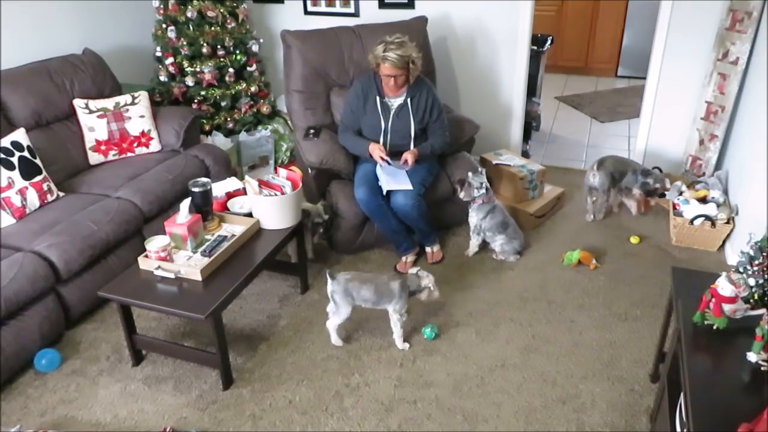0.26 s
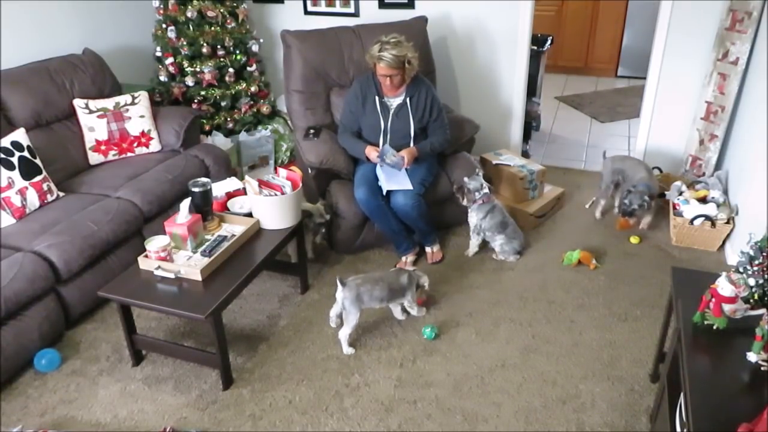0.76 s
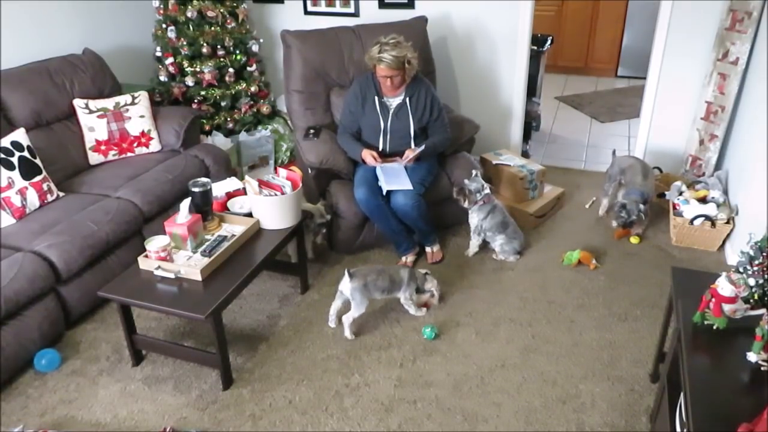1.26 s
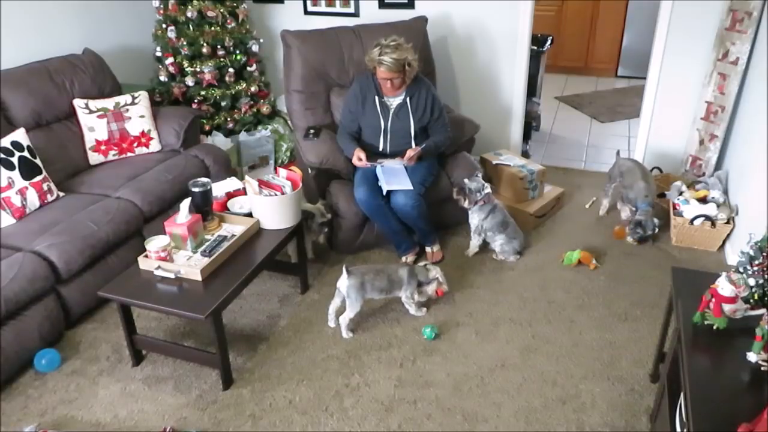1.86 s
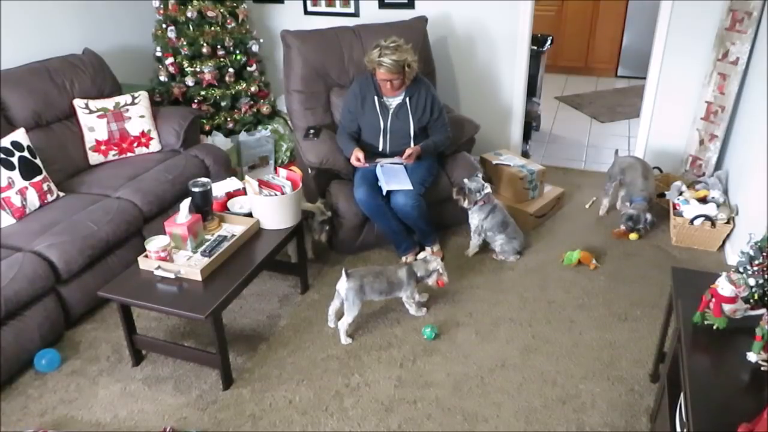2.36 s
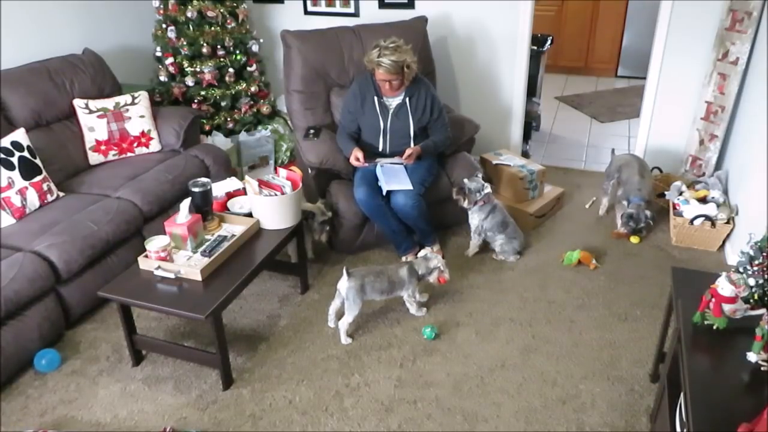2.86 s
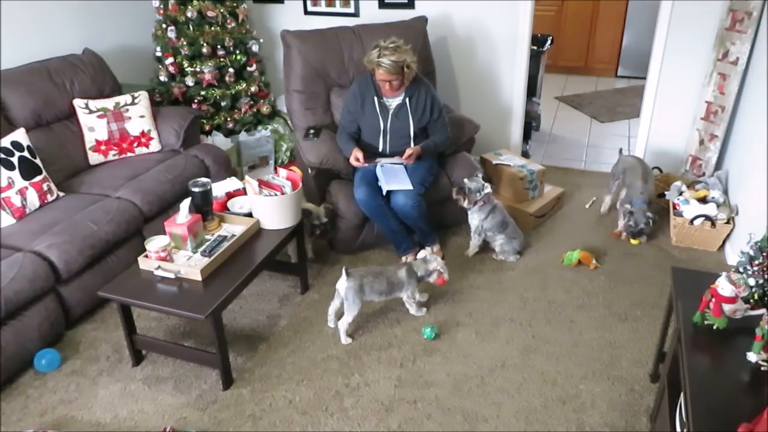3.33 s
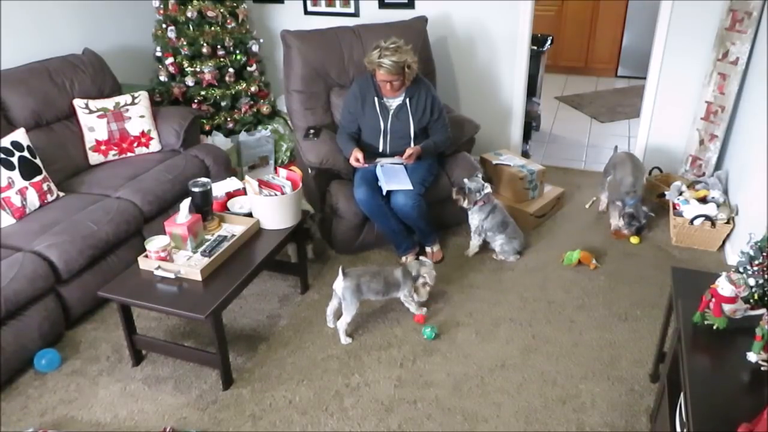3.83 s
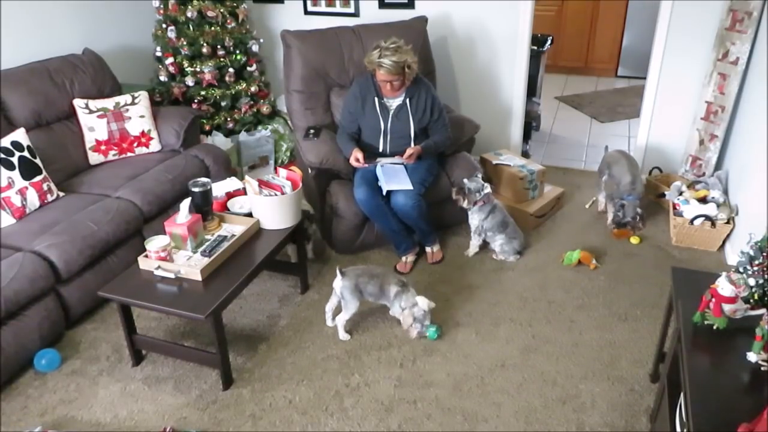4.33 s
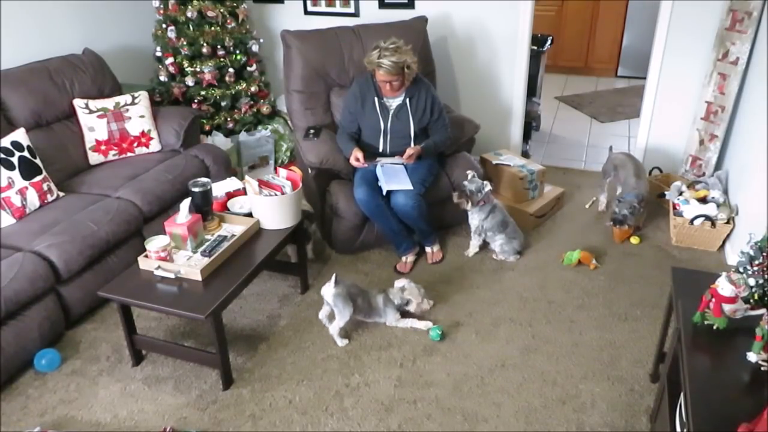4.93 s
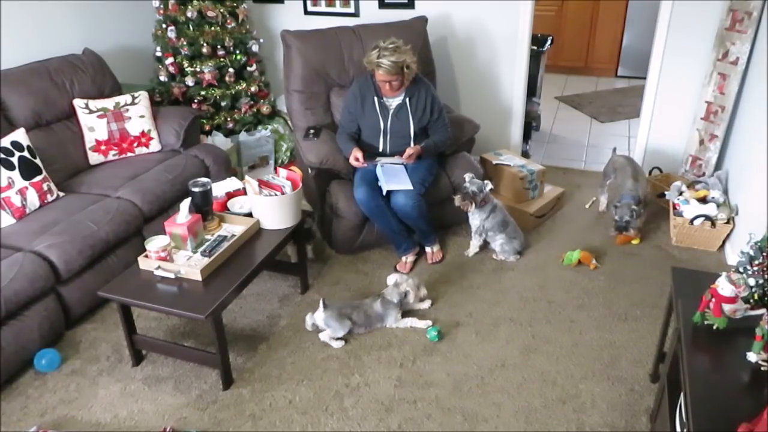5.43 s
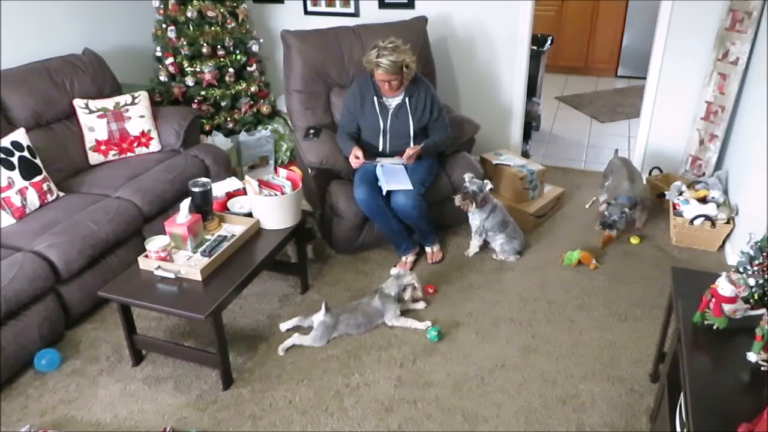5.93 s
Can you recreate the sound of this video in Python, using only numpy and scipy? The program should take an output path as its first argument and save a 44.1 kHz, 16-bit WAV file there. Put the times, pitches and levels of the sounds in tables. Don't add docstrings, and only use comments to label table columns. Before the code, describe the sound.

Short, hoarse rubber-toy squeaks come in uneven bursts as a dog bites and releases, with paw thuds, small knocks and faint room tone.

```python
import sys
import numpy as np
from scipy import signal
from scipy.fft import rfft, irfft, next_fast_len
from scipy.io import wavfile
from scipy.ndimage import uniform_filter1d

SR = 44100
rng = np.random.default_rng(int(sys.argv[2]) if len(sys.argv) > 2 else 0)


def master_out(mix):
    frames = np.transpose(np.atleast_2d(mix))
    ceiling = np.clip(frames, -1, 1)
    pcm = np.round(ceiling * 32767).astype(np.int16)
    wavfile.write(sys.argv[1], SR, pcm)


def rack_gain(trim_db):
    fader = np.asarray(trim_db, float)
    return 10 ** (fader / 20)


N = 272979

# frequency in Hz, density in dB per Hz.
TONE_SPECTRUM = [(15, -33), (25, 5), (82, -6.5), (113, -9), (144, -9), (413, -11.5), (448, -12), (708, -16),
                 (768, -16.5), (878, -17), (2730, -21), (3380, -22.5), (11000, -36.5), (15700, -48)]
# frequency in Hz, side over mid in dB.
TONE_SIDE = [(60, -24), (150, -3.5), (380, 1.5), (950, 0.5), (2380, -2), (5980, -1.5), (15000, -3)]
# frequency in Hz, side over mid in dB.
ROOM_SIDE = [(100, -30), (400, -30), (1000, -19), (2000, -19.5), (4000, -6), (8000, -1.5), (13000, 4)]
# frequency in Hz, phase lead of left in radians.
PORT_PHASE = [(300, 0), (3000, .05), (6300, .3), (8500, -1.2), (10100, .1), (13400, -2.6), (15400, -1)]
# frequency in Hz, T60 in seconds.
ROOM_T60 = [(100, 0.36), (800, 0.3), (2000, 0.31), (5500, 0.3), (10000, 0.2), (14000, 0.19)]
# delay in seconds, level in dB re tail.
ECHOES = [
    (.0021, -9),
    (.0062, -10),
    (0.0139, -10.5),
    (.021, -18.5),
]
# frequency in Hz, level in dB.
SOFT_WALLS = [(200, 1.5), (1000, 0), (4000, 0), (9000, -3), (12000, -2), (15500, -7.5)]
# start in seconds, peak in dB, pitch in Hz, T60 in seconds.
THUDS = [(0.28, -31.5, 71.7, 0.066), (0.462, -46.5, 104, 0.35), (0.569, -45, 51.1, 0.15),
         (0.823, -31.5, 76.5, 0.13), (0.894, -37.5, 77.5, 0.13), (1.031, -50, 50.6, 0.2),
         (1.424, -31, 86.6, 0.14), (1.723, -42, 93, 0.12), (2.043, -39.5, 108, 0.15),
         (2.438, -43, 70, 0.28), (2.469, -62, 49, 0.15), (3.696, -29.5, 74, 0.13),
         (3.844, -44.5, 52.4, 0.34), (4.052, -47, 74, 0.27), (4.142, -35, 67.6, 0.28),
         (4.17, -35, 54, 0.23), (4.202, -24, 79.5, 0.08), (5.681, -50, 68.6, 0.18),
         (5.751, -39.5, 62, 0.17), (6.111, -43, 65.3, 0.11), (6.148, -35, 50.3, 0.17)]
# start in seconds, peak in dB, pitch in Hz, T60 in seconds.
KNOCKS = [(1.197, -55, 434, 0.076), (1.422, -32, 199, 0.093), (1.42, -27.5, 402, 0.055),
          (1.436, -35, 284, 0.11), (1.448, -54, 430, 0.086), (1.47, -40, 210, 0.094),
          (1.895, -42, 350, 0.043), (2.049, -40.5, 178, 0.13), (3.633, -39.5, 385, 0.045),
          (3.656, -38.5, 185, 0.1), (4.172, -41, 190, 0.21), (4.431, -51, 170, 0.14),
          (4.459, -47.5, 177, 0.43), (4.899, -43.5, 340, 0.13), (5.161, -48, 431, 0.088)]
# time in seconds, level in dB.
FUR_SLIDE = [
    (5.85, -85),
    (5.924, -88),
    (5.954, -73),
    (6.114, -62.5),
    (6.18, -72),
    (6.19, -77),
]
# start in seconds, ring peak in dB, ring pitch in Hz, crack above 6 kHz in dB.
CLICKS = [(0.906, -35, 2480, -49), (1.185, -46.5, 1770, -73), (1.4225, -32, 2100, -58),
          (2.417, -24.5, 3034, -18), (2.4287, -45, 2660, -46), (3.617, -36.5, 3120, -63.5),
          (4.2362, -43, 3360, -60), (4.4295, -39, 820, -70), (4.79, -48, 2000, -62),
          (5.1655, -34.5, 2050, -42), (5.9584, -45, 1540, -67), (6.05, -46, 1280, -69),
          (6.1004, -55, 1700, -65)]
# time in seconds, pitch in Hz, level in dB.
INTAKE = [
    (4.65, 7500, -67),
    (4.664, 7520, -39.5),
    (4.704, 7570, -91),
    (4.726, 7400, -43),
    (4.77, 7900, -84),
]

# start, crest and end in seconds, crest and end level in dB.
BITES = [(0, 0.03, .15, -40, -56.5), (0.287, 0.407, .455, -36.5, -40), (0.471, 0.539, .6, -33.5, -39),
         (0.637, 0.672, .74, -38, -43), (0.731, 0.751, .825, -36.5, -50), (1.419, 1.421, 1.465, -41.5, -57),
         (1.509, 1.528, 1.595, -48, -53.5), (1.612, 1.658, 1.685, -39.5, -54),
         (1.879, 1.892, 1.935, -43.5, -54.5), (1.949, 1.984, 2.005, -46.5, -42.5),
         (2.021, 2.095, 2.14, -29, -40), (2.155, 2.182, 2.27, -43.5, -46.5), (3.255, 3.278, 3.32, -31, -45),
         (3.45, 3.458, 3.49, -48, -64), (3.627, 3.641, 3.725, -44, -45),
         (4.493, 4.547, 4.576, -44.5, -60.5), (4.837, 4.863, 4.895, -42, -53.5),
         (4.907, 4.952, 5.03, -34.5, -50), (5.082, 5.161, 5.237, -47, -57), (5.259, 5.27, 5.35, -35, -43),
         (5.567, 5.594, 5.62, -47.5, -77), (5.623, 5.635, 5.72, -38.5, -49)]
# start, crest and end in Hz, lateness exponents of the swell and of the fall.
PITCH = [(1147, 1110, 945, 1.23, .7), (969, 1345, 1000, 2.7, 1.6), (1118, 1255, 1065, 2.7, 1.2),
         (1143, 1590, 1170, .8, 0.92), (1173, 1100, 936, 1.8, 0.94), (1406, 1500, 1010, 0.95, 0.55),
         (950, 1000, 930, 0.71, 0.85), (1092, 1130, 990, 0.84, 1.14), (980, 940, 915, 1.1, 1),
         (955, 1015, 957, 1.21, 1), (1120, 1258, 1030, 1.8, 1), (980, 958, 930, 0.81, 1.62),
         (1080, 1147, 1050, 0.9, 1.12), (924, 947, 880, 1.1, 2.1), (1036, 1320, 905, 0.91, .78),
         (1074, 1115, 950, 1.46, 1.06), (1224, 1262, 1030, 1.1, 0.905), (1033, 1182, 960, 0.8, 1.3),
         (928, 1112, 935, .7, 1.6), (1110, 1118, 1012, 0.86, 0.42), (1434, 1635, 1600, 0.9, 2.7),
         (1235, 1265, 1095, 1.1, 0.55)]
# one bite, in dB.
SOFT_START_DB = [-4.5, 7.5, 5.5, 4, 1, 10, -2, 3, 2, -6, 4.5, 5, 6, 2, 4, 9, 4, 1.5, 2, 7, -2, 2]
# lateness exponent of the level fall, shading above 11 kHz in dB.
RELEASE = [(1.398, -2), (0.67, -4.5), (0.77, 1), (1.2, -1.5), (1.12, -8), (1.33, -12), (1.5, -5),
           (1.098, 1), (1.4, -1), (1.1, 5.5), (1.25, 8), (1.6, -0.5), (0.83, 2.5), (0.89, -2), (1, 4),
           (1.07, 0), (0.78, 7), (0.92, 11), (1.64, 2), (0.61, -1), (0.5, 10), (0.93, 7)]
HOARSE = [(.006, 0, 0, .04), (.005, .03, .04, .035), (.004, .03, 0, .025), (.003, 0, 0, .035),
          (.005, 0, 0, .05), (.013, 0, 0, .11), (.002, 0, .02, .015), (.003, .04, 0, .025),
          (.003, .03, 0, .02), (.002, .03, 0, .015), (.002, 0, .02, .01), (.001, .02, 0, .008),
          (.003, .05, .01, .02), (.002, .04, 0, .02), (.004, 0, 0, .045), (.002, .03, .02, .012),
          (.004, .07, .03, .035), (.006, 0, 0, .05), (.002, .05, .02, .012), (.002, 0, .02, .02),
          (.006, .08, .03, .05), (.004, .17, 0, .035)]
# first, second and third partial in dB over the higher ones.
GRIP = [(-2.5, -1, -0.5), (-1, 4, -3), (-2, -2.5, 0), (9.5, 4, -0.5), (-11.5, -4.5, -5.5), (2.5, -3, -6.5),
        (5, -0.5, -3.5), (1.5, 0, -9), (-4, -10, -5), (-5.5, -10.5, -4), (-15.5, -6.5, -7.5),
        (-3.5, -5, 0.5), (-7.5, -4.5, -7), (-0.5, 7, 4), (-2.5, 3.5, -2.5), (2.5, 8.5, 6), (6.5, -8, 6),
        (-14.5, -10.5, -9.5), (4.5, 5.5, -2), (-11.5, -6.5, -9.5), (11, 2, 7.5), (-2.5, -9, -3)]
# change of first and second partial by the end of the fall, in dB.
OPENING = [(0, 9), (-0.5, -8), (-4.5, 2.5), (-15, -3), (23.5, 7.5), (4.5, 8), (0.5, 8.5), (-1, -20),
           (-3.5, 17), (-2, 14), (4, -4.5), (-2, 5.5), (4, 6.5), (-2, -6), (6, -3.5), (8.5, -13), (-6, 13),
           (17, 9.5), (6.5, 1), (11.5, -3), (13, 14), (4, 8.5)]
# frequency in Hz, level in dB.
HOLLOW = [(3500, 6), (4600, 2.5), (5800, 2), (6800, -10.5), (8500, -7), (10500, -13), (12700, -19),
          (15500, -32)]
# at 5.3 kHz, at 6.3 kHz and above 8 kHz in dB, direct sound in dB as the head turns.
SHADE = [(4, -9, 5, -1), (-7.5, -26, 5, -4.5), (-8, -6, -5.5, -1), (-23, -32, -6.5, 0),
         (1, -15, 17.5, -4.5), (-2, -3, -2, 3), (-3, -16, 16.5, -2), (3.5, 3, 12, -3), (-8, -18, 0, -2.5),
         (-8, -13, -3, 0), (14, 16.5, 6, 2), (-2, -4, 2.5, 0), (-1.5, 11, 2, 0), (2, -5, 6.5, -1.5),
         (-5, -6.5, 3, 1), (-6.5, 2.5, -4.5, 4.5), (0, 2, 0.5, -3), (4, 15.5, -3.5, -1), (-7, 0, 2.5, -0.5),
         (-7, -3, -2, 0), (-19, 14, 4, -6), (1, -13, -2, 0)]
# one bite, in dB.
NOTCH_DB = [7.5, 6.5, -3, 0, 10, -3, 15, 2, 7, 4, 8, 10, -1, -13, -1.5, -21, 10, 9, 0, -6.5, 9, 3.5]
# one bite, in dB.
THROAT_DB = [0.3, -0.32, 3, -2, 0.83, 0.84, 0, 1.5, 0, 0.5, 2, 0.5, 5, -0.5, 0, 1.5, -4, 6.5, 1.5, 1.7, 1,
             1]


def rms_one(x):
    return x / np.sqrt(np.mean(x ** 2) + 1e-20)


def at_hz(points, hz):
    table_hz, values = np.array(points)[:, 0], np.array(points)[:, 1]
    return np.interp(np.log(np.maximum(hz, 1)), np.log(table_hz), values)


def bandpass(x, low_hz, high_hz):
    return signal.sosfilt(signal.butter(2, [low_hz, high_hz], "band", fs=SR, output="sos"), x)


def drift(rate_hz):
    pole = np.exp(-2 * np.pi * rate_hz / SR)
    noise = rng.standard_normal(N + SR)
    return rms_one(signal.lfilter([1], [1, -2 * pole, pole * pole], noise)[SR:])


def stroke(rows, rise_s, fall_s):
    s, *columns = np.transpose(rows)
    at = np.arange(max(round(s[0] * SR), 0), min(round(s[-1] * SR), N))
    rise = (at / SR - s[0] + (s[0] < rise_s)) / rise_s
    fall = (s[-1] - at / SR) / fall_s
    gate = np.sin(np.pi / 2 * np.clip(np.minimum(rise, fall), 0, 1)) ** 2
    return at, [np.interp(at / SR, s, c) for c in columns], gate


def blow(s, db, hz, t60_s, rise_s, rough):
    at = min(round(s * SR), N - 1)
    t = np.arange(min(N - at, SR // 2, round(0.86 * max(t60_s, .01) * SR))) / SR
    noise = bandpass(rng.standard_normal(SR // 2)[:len(t) + SR // 20], hz * .6, hz * 1.5)
    body = (1 - rough) * np.sin(2 * np.pi * hz * t) + rough * rms_one(noise)[:len(t)]
    envelope = rack_gain(db - 60 * t / max(t60_s, .003)) * (1 - np.exp(-t / rise_s))
    out = np.zeros(N)
    out[at:at + len(t)] = envelope * body
    return out


def still_air(level_db, sway_db):
    hz = np.arange(N // 2 + 1) * SR / N
    rumble_cut = np.sqrt(1 + (34 / (hz + 1)) ** 12)
    mid, side = rfft(rng.standard_normal((2, N))) * rack_gain(at_hz(TONE_SPECTRUM, hz)) / rumble_cut
    side = side * rack_gain(at_hz(TONE_SIDE, hz))
    both = np.array([mid + side, mid - side])
    low = 1 / (1 + (hz / 120) ** 4)
    tone = irfft(both * low, N) * rack_gain(sway_db * drift(2.1)) + irfft(both * (1 - low), N)
    return rack_gain(level_db) * tone / np.sqrt(np.mean(irfft(mid, N) ** 2))


def room(facing, all_round, wet_db, gap_s):
    size = next_fast_len(N + SR)
    hz = np.arange(size // 2 + 1) * SR / size
    t = np.arange(SR // 2) / SR
    tail, white = 0, rng.standard_normal((2, SR // 2))
    build_up = 1 - np.exp(-(t / gap_s) ** 2)
    for low_hz in 44 * 2. ** np.arange(0, 8.5, .5):
        band = bandpass(white, low_hz, low_hz * np.sqrt(2))
        tail = tail + band * rack_gain(-60 * t / at_hz(ROOM_T60, low_hz * 1.1)) * build_up
    mid, side = rfft(tail / np.sqrt(np.sum(tail[0] ** 2)), size) * rack_gain(at_hz(SOFT_WALLS, hz))
    mid = mid + sum(rack_gain(db) * np.exp(-2j * np.pi * hz * s) for s, db in ECHOES)
    side = side * rack_gain(at_hz(ROOM_SIDE, hz))
    ports = np.exp(.5j * at_hz(PORT_PHASE, hz) * np.array([[1], [-1]]))
    direct = rfft(facing, size) * ports
    reverb = rfft(all_round, size) * rack_gain(wet_db) * np.array([mid + side, mid - side])
    return irfft(direct + reverb, size)[:, :N]


def paw_thuds():
    return sum(blow(s, db, hz, t60_s, rise_s=.008, rough=.2) for s, db, hz, t60_s in THUDS)


def jaw_knocks():
    return sum(blow(s, db + 1.5, hz, t60_s, rise_s=0.00052, rough=0.28) for s, db, hz, t60_s in KNOCKS)


def fur():
    out = np.zeros(N)
    at, (db,), gate = stroke(FUR_SLIDE, rise_s=.02, fall_s=.002)
    noise = rms_one(bandpass(rng.standard_normal(N), 700, 3000))
    out[at] = gate * rack_gain(db + 2.2 * drift(24)[at]) * noise[at]
    return out


def teeth():
    crack = sum(blow(s, crack_db - 0.5, 11200, 0.0065, 0.00066, rough=0.53) for s, _, _, crack_db in CLICKS)
    ring = sum(blow(s, db - 3.0, hz, 0.044, 0.00059, rough=0.51) for s, db, hz, _ in CLICKS)
    return crack + ring


def intake():
    out = np.zeros(N)
    at, (hz, db), gate = stroke(INTAKE, rise_s=.008, fall_s=.02)
    phase = 2 * np.pi * np.cumsum(hz * (1 + 0.0033 * drift(87)[at])) / SR
    out[at] = gate * rack_gain(db - 10.0 + 2.9 * drift(36)[at]) * np.sin(phase)
    return out


def bite(times, pitch, soft_db, late_drop):
    start_s, crest_s, end_s, crest_db, end_db = times
    start_hz, crest_hz, end_hz, late_swell, late_fall = pitch
    at, (swell, fall), gate = stroke([(start_s, 0, 0), (crest_s, 1, 0), (end_s, 1, 1)], .004, .008)
    up = np.sin(np.pi / 2 * swell ** late_swell) ** 2
    down = np.sin(np.pi / 2 * fall ** late_fall) ** 2
    rising_hz = start_hz + (crest_hz - start_hz) * up
    hz = rising_hz + (end_hz - crest_hz) * down
    db_per_octave = 9.5
    db = crest_db + db_per_octave * np.log2(rising_hz / crest_hz) - soft_db * (1 - swell)
    return at, gate, fall, hz, db + (end_db - crest_db) * fall ** late_drop


def bend(hz, at, sag, scoop):
    sag_s, scoop_s = .028, .012
    ending = np.clip(1 - (at[-1] - at) / (sag_s * SR), 0, 1)
    onset = np.clip(1 - (at - at[0]) / (scoop_s * SR), 0, 1) ** 2
    return hz * (1 - sag * ending - scoop * onset)


def squeaker(flutter_db, hiss_db):
    out = np.zeros((2, N))
    wander = drift(190) + drift(47.0)
    k = np.arange(1, 17)[:, None]
    upper = k[3:]
    flutter = np.array([drift(69) for _ in range(4)])[k[:, 0] % 4]
    white = rng.standard_normal(N)
    hiss = rms_one(bandpass(white, 1510, 7900))
    shiver = rms_one(bandpass(white, 50.3, 390))
    lean = rng.standard_normal((len(BITES), 16))
    for i, own in enumerate(lean):
        late_drop, edge_db = RELEASE[i]
        hoarse, sag, scoop, rasp = HOARSE[i]
        mid_db, dip_db, top_db, facing_db = SHADE[i]
        at, gate, fall, hz, db = bite(BITES[i], PITCH[i], SOFT_START_DB[i], late_drop)

        hz = bend(hz, at, sag, scoop)
        slide = uniform_filter1d(np.gradient(np.log(hz)) * SR, size=400)
        waver = hoarse * np.clip(.4 + np.maximum(-slide / 2.5, slide / 6), 0, 2)
        phase = 2 * np.pi * np.cumsum(hz * (1 + waver * wander[at])) / SR
        phase = phase + rasp * (.5 + .7 * waver / hoarse) * shiver[at]

        shade = [(4300, THROAT_DB[i]), (5300, mid_db), (6300, dip_db), (7200, NOTCH_DB[i]),
                 (9200, top_db), (11500, top_db + edge_db)]
        upper_hz = upper * hz
        high = rack_gain(at_hz(HOLLOW, upper_hz) + at_hz(shade, upper_hz) + 2 * own[3:, None]) * (upper_hz < 16500)
        high = rack_gain(db) * high / np.sqrt(np.sum(high ** 2, axis=0))
        low = rack_gain(db + np.array(GRIP[i])[:, None] + np.append(OPENING[i], 0)[:, None] * fall)
        depth_db = flutter_db * np.minimum(np.sqrt(waver / 0.001), 1.6)
        levels = np.vstack([low, high]) * rack_gain(depth_db * flutter[:, at])

        tone = np.sum(levels * np.cos(k * phase + 0.462 * k ** 2 + own[:, None]), axis=0)
        air = rack_gain(db + hiss_db) * (0.16 + waver / 0.0029) * hiss[at] * (1 + np.cos(phase))
        muffled_db = facing_db - 0.3 * np.clip(-slide, 0, 4)
        out[:, at] += rack_gain([muffled_db, 0 * slide]) * gate * (np.sqrt(2) * tone + air)
    return out


def scene():
    dog = squeaker(flutter_db=2.0, hiss_db=-24.5) + intake() + teeth() + fur() + jaw_knocks()
    balance = rack_gain([[-.2], [.2]])
    in_room = room(*dog, wet_db=-3.0, gap_s=0.0024) * balance
    return in_room + paw_thuds() + still_air(level_db=-57.5, sway_db=3.5)


def roll_off(x):
    return signal.sosfilt(signal.butter(12, 15790, fs=SR, output="sos"), x)


def record(dry):
    mix = signal.sosfilt(signal.cheby2(12, 60, 16400, fs=SR, output="sos"), dry)
    return roll_off(mix)


dry = scene()
out = record(dry)
master_out(out)
```